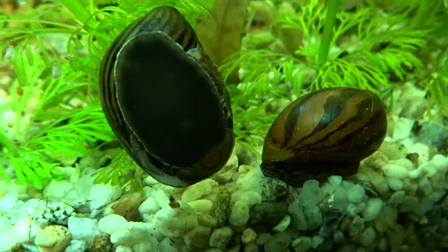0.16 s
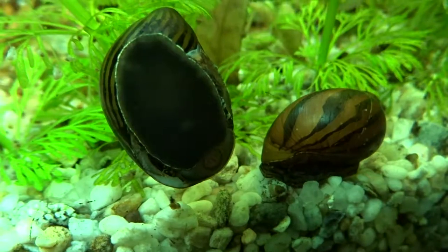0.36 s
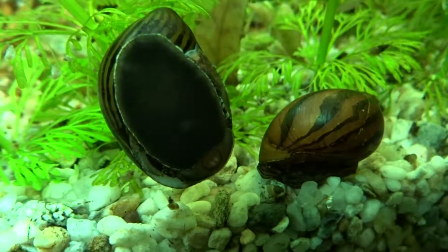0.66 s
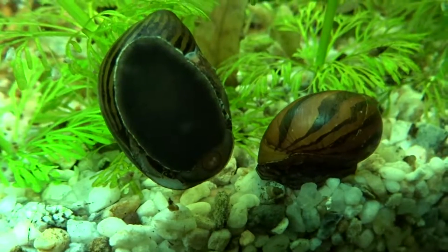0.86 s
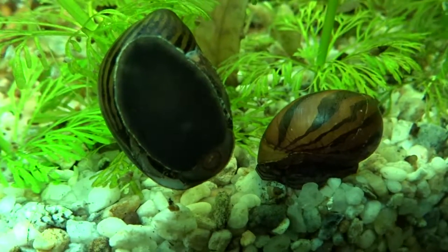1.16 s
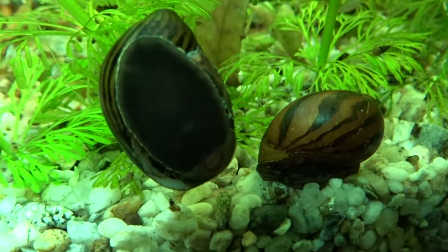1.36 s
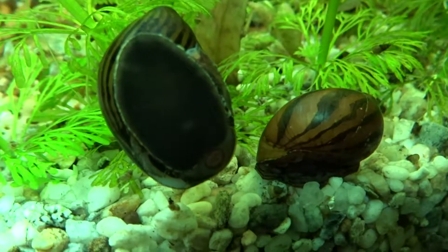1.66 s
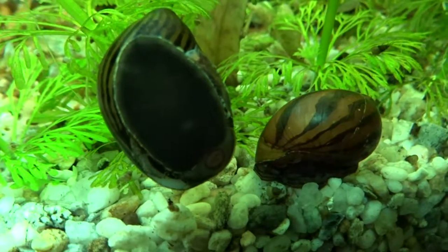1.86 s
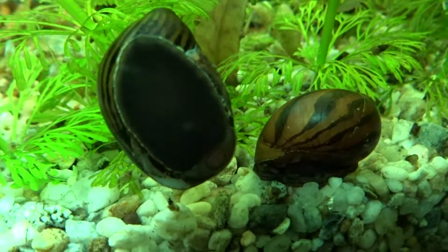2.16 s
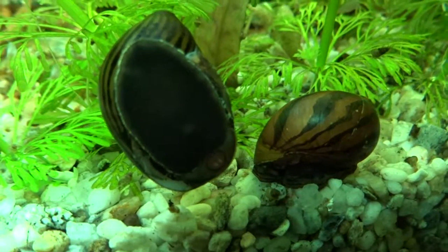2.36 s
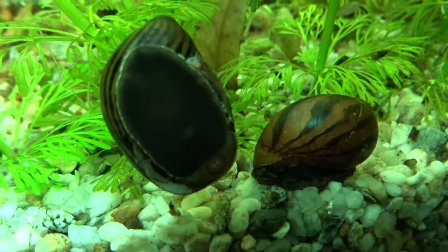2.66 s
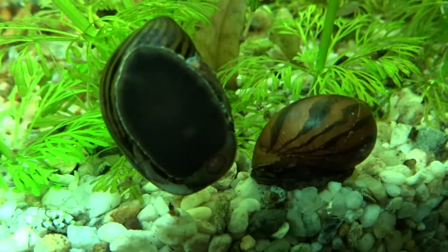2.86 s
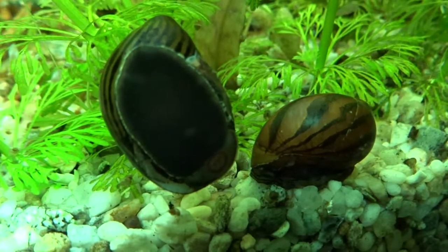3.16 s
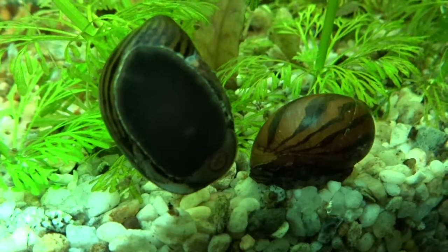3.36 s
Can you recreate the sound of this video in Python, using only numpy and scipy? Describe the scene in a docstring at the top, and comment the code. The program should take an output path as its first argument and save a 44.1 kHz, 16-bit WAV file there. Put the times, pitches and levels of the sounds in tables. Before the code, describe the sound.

An aquarium filter pump fades in within the first 0.3 seconds and hums until the end at 3.5. The low, buzzy mains hum flutters roughly twelve times a second, with churning water and a midrange rattle. Fine fizzing bubbles continue above it, with tiny soft splashes near 0.4, 0.8, 1.2 and 2.5 seconds. Faint rapid ticks, a thin high whirr and microphone hiss sit behind, in a quiet room, close stereo.

```python
"""In a quiet room, an aquarium filter pump hums on the mains beside the glass of its tank.
The hum is a stack of mains harmonics; the rotor wobbles about twelve times a second, so it flutters
and a noise resonance rattles. The returning water is shaped noise with ringing bubbles, and now and then
splashes softly. Faint regular ticks, a thin whirr of narrow noise bands, room air and microphone hiss
lie behind. The sound fades in."""
import sys
import numpy as np
from scipy.fft import rfft, irfft, next_fast_len
from scipy.io import wavfile
from scipy.ndimage import map_coordinates

SR = 44100
rng = np.random.default_rng(int(sys.argv[2]) if len(sys.argv) > 2 else 0)


def pcm_store(signal):
    """Save signal as 16-bit PCM."""
    levels = np.round(np.clip(np.atleast_2d(signal), -1, 1) * 32767)
    wavfile.write(sys.argv[1], SR, levels.astype(np.int16).T)


N = 155232

MAINS_HZ = 50
# How alike the two ears are, by pitch: (f/Hz, likeness from 0 to 1)
EAR_LIKENESS = [(200, 1), (400, 1), (650, 0.98), (1150, 0.84), (3100, 0.86), (6800, 1), (7600, 0.73)]


def amp(db):
    """Decibels to gain."""
    return 10 ** (np.asarray(db) / 20)


def along(points, hz):
    """Read a curve of (f/Hz, value) points on a log frequency axis."""
    f, value = np.transpose(points)
    return np.interp(np.log(hz + 1), np.log(f + 1), value)


def clock():
    """Seconds at each sample."""
    return np.arange(N) / SR


def over_time(points):
    """Read a curve of (t/s, value) points at each sample."""
    return np.interp(clock(), *np.transpose(points))


def drift(rate):
    """A smooth random curve, rate knots a second."""
    knots = rng.standard_normal(int(N * rate / SR) + 4)
    return map_coordinates(knots, [clock() * rate])


def filtered(x, response):
    """Shape the spectrum of x by a response of frequency."""
    m = next_fast_len(N + SR // 2)
    hz = np.fft.rfftfreq(m, 1 / SR)
    return irfft(rfft(x, m) * response(hz), m)[..., :N]


def white_noise(*shape):
    """White noise with unit power per Hz."""
    return rng.standard_normal(shape) * np.sqrt(SR / 2)


def split(db):
    """Gains for a pair of channels, the first db above the second."""
    db = np.atleast_1d(db)
    return amp(np.array([db, -db]) / 2)


def band(hz, centre, width, db):
    """Gain of one resonance, halved at width Hz either side of its centre."""
    return amp(db) / (1 + ((hz - centre) / width) ** 2)


def ear_angle(hz):
    """Half the angle whose cosine is the likeness of the ears."""
    return np.arccos(np.clip(along(EAR_LIKENESS, hz), 0, 1)) / 2


def noise(gain):
    """Stereo noise shaped by gain, the ears partly alike; two rows of gain act on mid and side."""
    def mid_side_gain(hz):
        angle = ear_angle(hz)
        return gain(hz) * np.array([np.cos(angle), np.sin(angle)])

    mid, side = filtered(white_noise(2, N), mid_side_gain)
    return np.array([mid + side, mid - side])


def rotor_wobble():
    """Phase of the rotor's wobble in radians, summed from its changing speed."""
    # Wobble speed: (t/s, turns per second/Hz)
    speed = [(0, 11.45), (.7, 11.45), (1.05, 10.95), (1.45, 11.75), (1.85, 12.65), (2.3, 11.05),
             (2.8, 12.2), (3.5, 11.9)]
    start = 1.4  # radians
    return start + 2 * np.pi * np.cumsum(over_time(speed)) / SR


def hum(wobble):
    """Mains harmonics, each flanked by sidebands from the wobbling rotor; the room shifts them between the ears."""
    # Harmonics from the first up, relative: (tone level/dB, lower sideband level/dB, upper sideband level/dB)
    harmonics = [(-65, -85, -84), (-65, -76, -69), (-56, -64, -68), (-45, -65, -72), (-67, -77, -69),
                 (-46, -65, -58), (-49, -64, -67), (-54, -71, -76), (-56, -72, -65), (-55, -69, -66),
                 (-59, -63, -72), (-68, -73, -72), (-72, -73, -77), (-70, -77, -69), (-65, -68, -77),
                 (-82, -80, -82), (-73, -81, -73), (-70, -83, -71), (-61, -67, -84), (-73, -71, -76),
                 (-72, -73, -73), (-81, -85, -80), (-75, -78, -80), (-78, -78, -81)]
    hum_db, sideband_db = 0.4, -2.5  # trims on the whole hum and on its flutter
    outer_db = -11  # second sidebands under the first
    glass_delay_s = 0.011025  # the glass delays the first harmonic this much, higher ones less
    odd_lag = 1.45  # radians; makes both strokes of a cycle about as strong
    diffuse_hz = 580
    sideband_turn, scatter = 0.77, 0.66  # radians: flutter from level towards timing, and its disorder
    twist, twist_count = 2.16, 10.35  # below this harmonic each flutters earlier than the next (radians)
    waver, sideband_waver = 0.035, 0.2  # random drift, as a share of the level

    out = np.zeros((2, N))
    mains = 2 * np.pi * MAINS_HZ * clock()
    for k, (tone_db, lower_db, upper_db) in enumerate(harmonics, 1):
        hz = k * MAINS_HZ
        lag = 4 * np.pi * MAINS_HZ * glass_delay_s * np.sqrt(k) + odd_lag * (k % 2)
        lag += rng.uniform(0, 2 * np.pi) * (hz > diffuse_hz)  # high harmonics arrive by many paths
        ears = np.array([[1], [-1]]) * (-1) ** k * ear_angle(hz)
        tone = amp(tone_db) * (1 + waver * (drift(8) + 1j * drift(8)))
        lead = twist * max(twist_count - k, 0)
        for way, db in ((-1, lower_db), (1, upper_db)):
            swing = np.exp(1j * way * (wobble + lead))
            turn = np.exp(1j * (sideband_turn + scatter * rng.standard_normal()))
            unsteady = turn * (1 + sideband_waver * drift(4.78))
            tone = tone + amp(db + sideband_db) * unsteady * swing * (1 + amp(outer_db) * swing)
        out += np.sqrt(2) * np.real(tone * np.exp(1j * (k * mains - lag + ears)))
    return amp(hum_db) * out


def churn(wobble):
    """Turbulence in the housing throbs with the strokes, two a mains cycle, and with the wobble."""
    # Water churning in the pump housing: (f/Hz, level per Hz/dB)
    colour = [(22, -104), (40, -81), (70, -90), (130, -79.5), (175, -85.5), (240, -83.5), (320, -81),
              (510, -82.5), (600, -87.5), (950, -86), (1170, -88.5), (1400, -101), (2200, -118)]
    flutter_db, stroke_db = -0.44, 3
    stroke = np.cos(4 * np.pi * MAINS_HZ * clock())
    throb = amp(flutter_db * np.cos(wobble) + stroke_db * stroke)
    return noise(lambda hz: amp(along(colour, hz))) * throb


def rattle(wobble):
    """A loose part of the housing rattles in one resonance, once each wobble."""
    centre_hz, width_hz, level_db, swing_db = 950, 36, -84.5, 6
    resonance = noise(lambda hz: band(hz, centre_hz, width_hz, level_db))
    return resonance * amp(swing_db * np.cos(wobble))


def bubbles():
    """Tiny bubbles of random pitch and size ring as they burst, each a decaying sine."""
    per_second, level_db, size_range_db = 420, -72.5, 17
    middle_hz, spread_octaves, decay_cycles = 2660, 1.1, 62  # cycles to fall by 60 dB
    count = int(per_second * N / SR)
    when, pitch, size = rng.random((count, 3)).T[:, :, None]
    hz = middle_hz * 2 ** (spread_octaves * (pitch - 0.5))
    t = np.arange(SR // 50) / SR
    decay = amp(-60 * hz * t / decay_cycles)
    rings = amp(size_range_db * size) * np.sin(2 * np.pi * hz * t) * decay
    places = (when * N).astype(int) + np.arange(len(t))
    out = np.bincount(places.ravel(), rings.ravel(), N)[:N]
    return amp(level_db) * out / out.std()


def outflow(wobble, flutter_db=1.05, ripple_db=0.24):
    """Water fizzes and bubbles at the surface, swelling into soft splashes with a little spray."""
    # Fizz at the surface: (f/Hz, level per Hz/dB)
    fizz = [(600, -112), (1200, -97), (1500, -95.5), (2200, -94), (2550, -89), (3100, -96.5), (3550, -93.5),
            (4100, -113), (4500, -113), (5000, -103.5), (5400, -102), (5700, -100), (6300, -105),
            (7300, -106), (7900, -122)]
    # Resonances in the outflow: (f/Hz, half-width/Hz, level per Hz/dB)
    resonances = [(1682, 55, -92.5), (1993, 36, -88), (2870, 62, -92.5), (3329, 48, -87)]
    # Strength of the outflow: (t/s, level/dB)
    strength = [(0, 0.5), (.45, -1), (.95, 0), (1.25, 1.5), (1.7, -1.9), (2.1, -0.7), (2.5, -0.2),
                (3.3, -1.8), (3.5, 0)]
    # Soft splashes: (t/s, level over the plain fizz/dB, length/s)
    splashes = [(.43, -2, 0.036), (0.776, 3.5, 0.031), (1.145, -2, 0.022), (1.236, 2.5, .022),
                (2.51, -2.5, 0.079), (3.492, -2.5, 0.033)]
    # Spray of the splashes, before each one's level: (f/Hz, level per Hz/dB)
    spray = [(1500, -112), (4000, -112), (6000, -105), (10000, -108), (15000, -118)]

    def colour(hz):
        ring_power = sum(band(hz, *ring) ** 2 for ring in resonances)
        return np.sqrt(amp(along(fizz, hz)) ** 2 + ring_power)

    def splash_colour(hz):
        dulled = colour(hz) / (1 + (hz / 4500) ** 4)
        return dulled + amp(along(spray, hz))

    t = clock()
    flow = amp(over_time(strength) + flutter_db * np.cos(wobble) + ripple_db * drift(35.2))
    splash = sum(amp(db) * np.exp(-(2 * (t - s) / length) ** 2) for s, db, length in splashes)
    return flow * (noise(colour) + bubbles()) + splash * noise(splash_colour)


def ticks():
    """Some small part ticks faintly and regularly, each tick one high decaying ring."""
    offset_s, per_second = 0.082, 12.2
    ring_hz, t60_s, attack_s = 6540, 0.05, 0.0013
    level_db, scatter_db = -61.5, 4
    turns = (clock() - offset_s) * per_second
    age = (turns % 1) / per_second  # seconds since the latest tick
    number = np.floor(turns).astype(int)
    size = amp(level_db + scatter_db * rng.standard_normal(size=64))[number]
    envelope = amp(-60 * age / t60_s) * (1 - np.exp(-age / attack_s))
    return size * np.sin(2 * np.pi * ring_hz * age) * envelope


def whirr(waver_db=0.3):
    """Thin bands of noise in the treble, wavering in level together."""
    # Narrow bands: (f/Hz, half-width/Hz, level per Hz/dB, mid over side/dB)
    thin_bands = [(4755, 68, -87, -5.5), (6520, 74, -96, 0.5), (7135, 134, -97.5, 1)]
    # Strength of the whirr: (t/s, level/dB)
    strength = [(.3, -.5), (.85, 0.5), (1, 1), (1.15, 1), (1.35, 2), (1.6, -2), (1.9, -0.5), (2.1, 1),
                (2.7, 0.5), (3.5, 0)]

    def colour(hz):
        return sum(band(hz, centre, width, db) * split(mid_db) for centre, width, db, mid_db in thin_bands)

    return noise(colour) * amp(over_time(strength) + waver_db * drift(39.4))


def room():
    """Faint low noise, unrelated in the two ears."""
    # Air of the room: (f/Hz, level per Hz/dB)
    air = [(25, -118), (70, -107), (200, -104), (400, -91), (800, -104), (1500, -120)]
    return filtered(white_noise(2, N), lambda hz: amp(along(air, hz)))


def scene():
    """Pump and water, leaning right in most bands, over the whirr and the room."""
    # Stereo balance of the tank: (f/Hz, left over right/dB)
    balance = [(380, 0), (700, -1.3), (1300, -1), (2000, -3), (3600, -1), (5000, -23), (6500, 3), (7600, 0)]
    wobble = rotor_wobble()
    tank = hum(wobble) + churn(wobble) + rattle(wobble) + outflow(wobble) + ticks()
    placed = filtered(tank, lambda hz: split(along(balance, hz)))
    return placed + whirr() + room()


def record(dry):
    """Hiss is added, the sound fades in, the top treble is mono and both ends of the band are cut."""
    # Microphone hiss: (f/Hz, level per Hz/dB)
    hiss_colour = [(1000, -110), (4000, -110), (8000, -108.5), (12000, -114), (15500, -119)]
    mono_above_hz, low_cut_hz, top_hz = 7800, 18, 15800
    fade_start_s, fade_s = 0.082, 0.095  # silent until the start; time constant of the rise

    def pass_band(hz):
        return (hz < top_hz) / np.sqrt(1 + (low_cut_hz / (hz + 1)) ** 8)

    hiss = filtered(white_noise(N), lambda hz: amp(along(hiss_colour, hz)))
    mid = dry.mean(axis=0)
    side = filtered(dry - mid, lambda hz: hz < mono_above_hz)
    fade = 1 - np.exp(-np.maximum(clock() - fade_start_s, 0) / fade_s)
    return filtered((mid + side + hiss) * fade, pass_band)


dry = scene()
out = record(dry)
pcm_store(out)
```